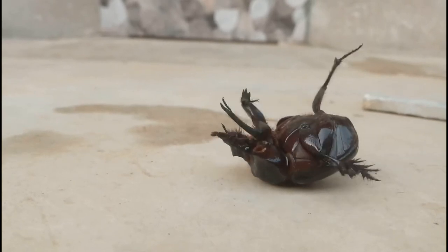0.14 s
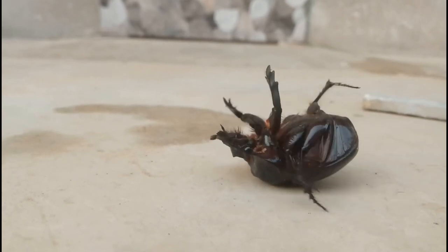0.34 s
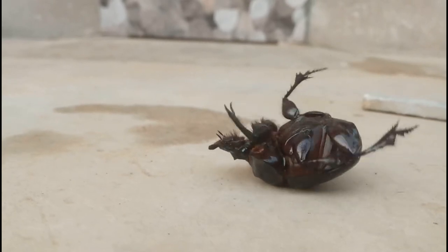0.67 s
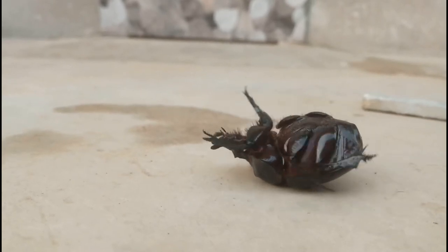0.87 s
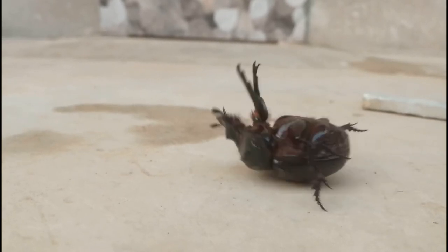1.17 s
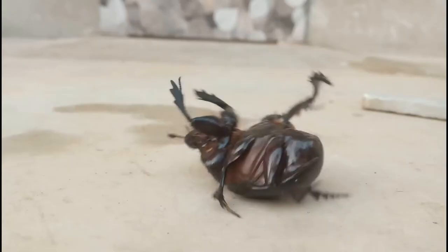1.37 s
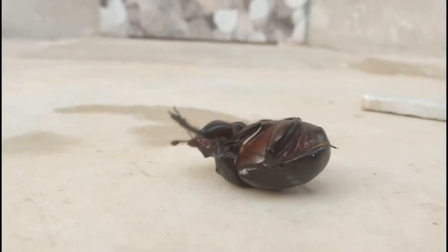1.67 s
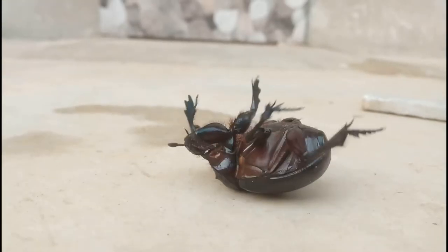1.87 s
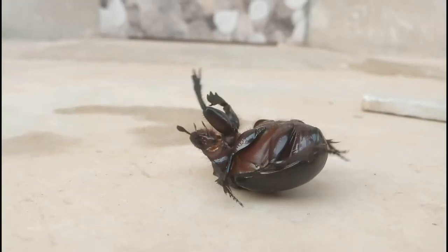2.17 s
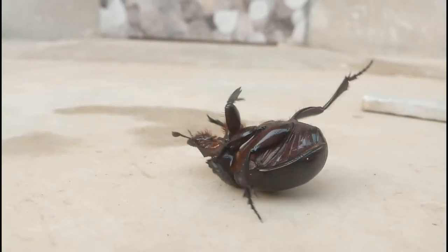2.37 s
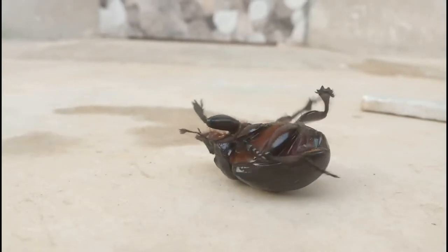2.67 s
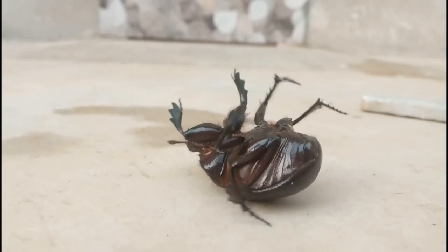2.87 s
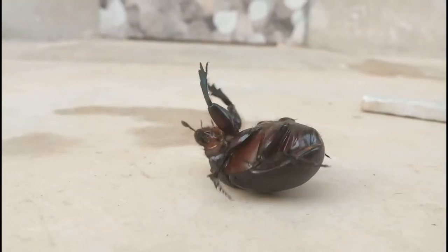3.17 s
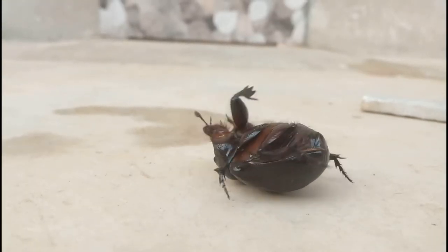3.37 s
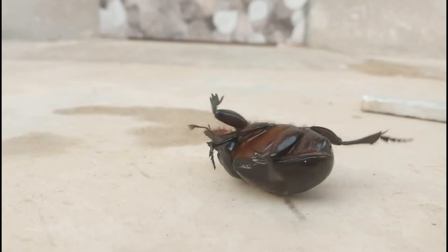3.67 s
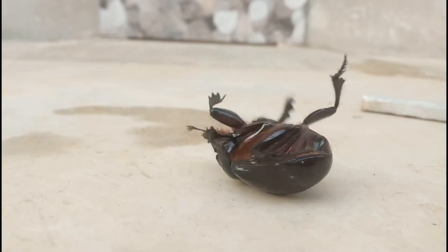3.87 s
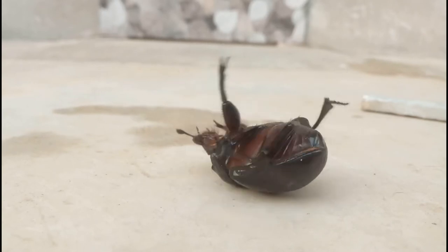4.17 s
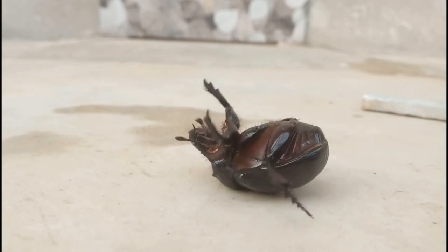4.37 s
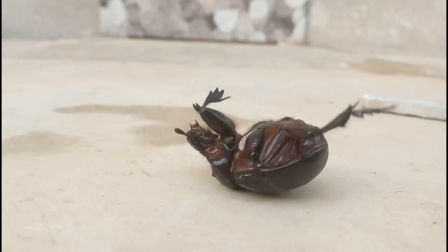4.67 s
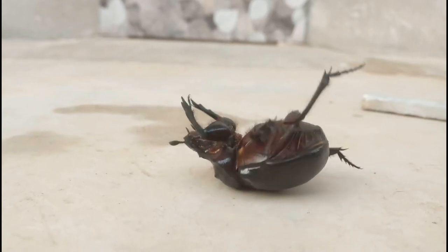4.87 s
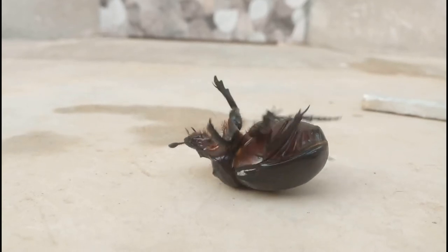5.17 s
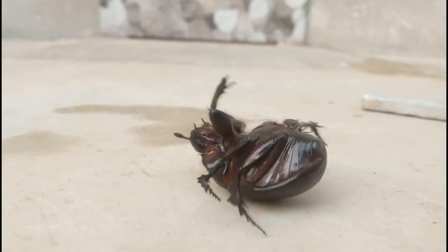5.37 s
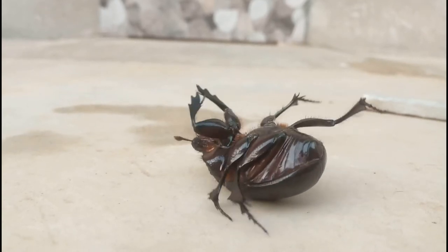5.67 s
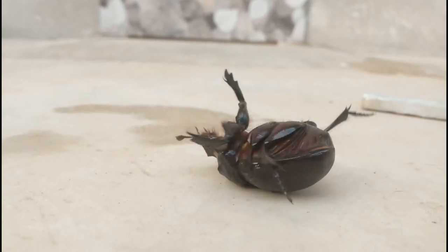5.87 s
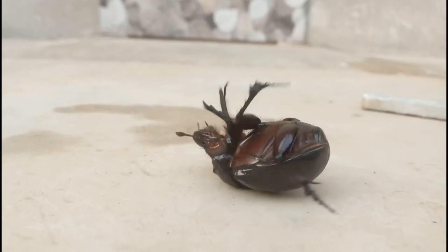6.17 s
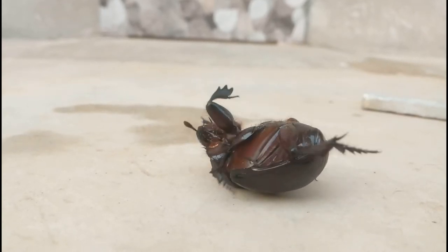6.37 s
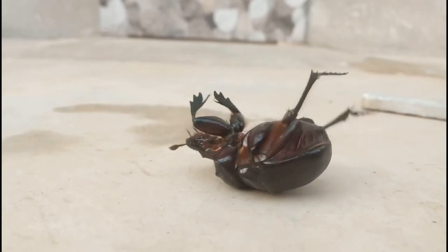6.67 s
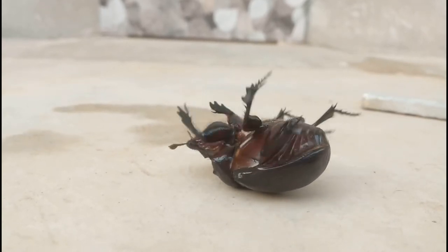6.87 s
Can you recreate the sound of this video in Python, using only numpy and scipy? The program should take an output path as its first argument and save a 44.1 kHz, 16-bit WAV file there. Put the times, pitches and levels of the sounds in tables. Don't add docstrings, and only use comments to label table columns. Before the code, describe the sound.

A large beetle stuck on its back rasps close by, scratchy zipping strokes swelling fast then slower, with tiny dry ticks between, over faint outdoor hiss.

```python
import sys
import numpy as np
from scipy import signal
from scipy.fft import rfft, irfft
from scipy.io import wavfile
from scipy.ndimage import uniform_filter1d, map_coordinates

SR = 44100
rng = np.random.default_rng(int(sys.argv[2]) if len(sys.argv) > 2 else 0)


def wav_record(signal):
    frames = np.transpose(np.atleast_2d(signal))
    bounded = np.clip(frames, -1, 1)
    quanta = np.round(bounded * 32767).astype(np.int16)
    wavfile.write(sys.argv[1], SR, quanta)


def linear_from_db(decibels):
    return 10 ** (np.asarray(decibels, float) / 20)


N = 310023
T = np.arange(N) / SR

# (start t/s, end t/s)
PUSH_SPANS = [(0, 0.39), (1.19, 1.52), (2.33, 2.86), (3.655, 4.38), (4.68, 5.22), (6.39, 6.78)]
# (start t/s, end t/s)
STALL_SPANS = [(.455, .528), (1.603, 1.633), (2.612, 2.6795), (2.921, 2.976), (4.039, 4.114),
               (4.289, 4.307), (4.984, 5.019), (5.24, 5.292), (6.905, 6.98)]
# (t/s, level/dB, ridge rate/Hz, treble/dB)
STROKE_TURNS = [(0.0, -30.5, 423, 6.5), (0.255, -40, 720, 4), (0.49, -35.5, 420, 4.5),
                (0.75, -32.5, 505, 4.5), (1.05, -36, 264, 4.5), (1.19, -36, 1290, -5),
                (1.405, -32, 1080, -6), (1.62, -30.5, 447, -2), (1.82, -33, 190, 0), (2.25, -30.5, 288, -5),
                (2.64, -31, 654, -7), (2.945, -30.5, 430, 1.5), (3.105, -29.5, 585, -1.5),
                (3.66, -37, 934, -7.5), (3.79, -23.5, 1650, -5), (4.08, -26, 420, -4),
                (4.296, -30, 420, -1), (4.65, -28, 1180, -10.5), (4.93, -24, 720, -2), (5.0, -40, 830, -6),
                (5.138, -33.5, 700, -4), (5.255, -28, 335, -3), (5.625, -29, 275, -2.5),
                (5.795, -27, 570, -3.5), (6.045, -33.5, 620, -6), (6.38, -41, 600, -13),
                (6.745, -30, 1190, -2.5), (6.935, -30, 400, -1), (7.03, -28.5, 260, -3)]
# (t/s, level/dB, ridge rate/Hz, treble/dB)
STROKE_HEIGHTS = [(0.13, -28.5, 1520, 2.5), (0.35, -25.5, 1590, 2), (0.675, -33.5, 710, 8.5),
                  (0.84, -34, 950, 5), (1.125, -33, 740, 3.5), (1.26, -26.5, 2000, -4),
                  (1.49, -21.5, 1640, -3.5), (1.77, -32, 485, -1.5), (1.915, -27.5, 660, -1.5),
                  (2.405, -25.5, 1500, -4.5), (2.76, -22.5, 1370, -4.5), (3.025, -27.5, 577, -2.5),
                  (3.25, -25.5, 750, -2.5), (3.715, -24.5, 2080, -8), (3.915, -20, 1340, -4.5),
                  (4.15, -23.5, 730, -3.5), (4.45, -27.5, 790, -5.5), (4.76, -22, 1400, -2),
                  (4.981, -23.5, 620, 0), (5.09, -30, 1310, -7), (5.19, -30.5, 427, -6),
                  (5.38, -26, 610, -2.5), (5.705, -25, 455, -3.5), (5.864, -26, 810, -1.5),
                  (6.23, -26, 1280, -8.5), (6.5, -20.5, 1300, -4), (6.84, -26.5, 380, -5),
                  (6.995, -28.5, 420, -2)]


def evened(x):
    return x / np.sqrt(np.mean(x ** 2) + 1e-20)


def drift(size):
    return evened(uniform_filter1d(uniform_filter1d(rng.standard_normal(N), size=size), size=size))


def within(spans):
    return sum((T >= start) & (T < end) for start, end in spans) > 0


def read(points, hz):
    f, value = np.transpose(points)
    return np.interp(np.log(hz + 1), np.log(f + 1), value, left=-70, right=-70)


def swell(at_turns, at_heights, quick_s, slow):
    clock = np.cumsum(~within(STALL_SPANS)) / SR
    turn, height = (clock[np.minimum(np.array(rows)[:, 0] * SR, N - 1).astype(int)]
                    for rows in (STROKE_TURNS, STROKE_HEIGHTS))
    stroke = np.clip(np.searchsorted(turn, clock) - 1, 0, len(height) - 1)
    nearest = stroke + (clock > height[stroke])
    away = abs(clock - turn[nearest])
    reach = abs(height[stroke] - turn[nearest]) + 1e-4
    left = np.clip(1 - away / reach, 0, 1) * (slow + (1 - slow) * np.exp(-away / quick_s))
    return at_heights[stroke] + left * (at_turns[nearest] - at_heights[stroke])


def judder():
    judder_hz, build_up_s, clean_s = 255, 0.14, 0.07
    stalls = np.r_[np.array(STALL_SPANS)[:, 0], 99]
    pushes = np.array(PUSH_SPANS)[:, 0]
    since_push = T - pushes[np.searchsorted(pushes, T, "right") - 1]
    to_stall = stalls[np.searchsorted(stalls, T)] - T
    settled = 1 - 0.85 * np.exp(-(since_push / clean_s) ** 2)
    depth = 0.15 + 1.7 * np.exp(-to_stall / build_up_s)
    beat = np.cos(2 * np.pi * np.cumsum(judder_hz * np.exp(0.2 * drift(200))) / SR)
    wander = np.where(within(PUSH_SPANS), 0.12, 0.22) * drift(220)
    jerk = np.exp(settled * (depth * beat + wander))
    return jerk / uniform_filter1d(jerk, size=2500)


def train(per_s, jerk, uneven, spread_db):
    draw = rng.standard_normal((30000, 2))
    ridge = np.arange(30000) + 0.5
    at = np.interp(ridge, np.cumsum(per_s * jerk) / SR, np.arange(N), right=N)
    crossed = at < N - 1
    at, draw = at[crossed].astype(int), draw[crossed]
    size = linear_from_db(spread_db[at] * draw[:, 0]) * np.sqrt(SR / per_s[at])
    at = np.clip(at + uneven[at] * draw[:, 1] * SR / per_s[at], 0, N - 1).astype(int)
    return np.bincount(at, size, N)


def ticks():
    # (t/s, peak level at the near microphone/dB)
    lone_ticks = [(0.4615, -16), (0.5167, -11), (0.5203, -14), (0.524, -10), (1.6046, -26), (2.6125, -11),
                  (2.6185, -14), (2.6268, -16), (2.6787, -25), (2.9222, -15), (2.9285, -11), (4.0407, -13),
                  (4.0436, -12), (4.0496, -7), (4.1017, -9), (4.1117, -11), (6.9516, -25), (5.1494, -10.5),
                  (5.1485, -10.5), (5.2415, -10), (5.2543, -10.5), (5.2857, -9), (5.1597, -10),
                  (5.1948, -7), (6.9158, -10), (6.9256, -11.5), (6.9347, -14), (6.9478, -12)]
    # (start t/s, end t/s, first gap/ms, last gap/ms, peak level/dB)
    creeping_runs = [(.477, 0.51, 4.0, 4.3, -20), (1.6094, 1.63, 4.4, 3.8, -16),
                     (2.9368, 2.974, 6.3, 3.5, -14.5), (4.0534, 4.096, 3.1, 8.5, -16.5),
                     (6.957, 6.972, 5.2, 6.2, -10), (4.9849, 5.013, 6.3, 4.04, -9.5),
                     (4.986, 5.014, 6.4, 6.1, -15), (5.266, 5.281, 4, 2.95, -14.5)]
    rows = list(lone_ticks)
    for start, end, first_ms, last_ms, db in creeping_runs:
        s = start
        for late, loud in rng.standard_normal((30, 2)):
            if s < end:
                rows.append((s + 0.00029 * late, db + 0.76 * loud))
            progress = min((s - start) / (end - start), 1)
            s += (first_ms + (last_ms - first_ms) * progress) / 1000
    return np.transpose(rows)


def ridges():
    _, turn_db, turn_per_s, turn_treble = np.transpose(STROKE_TURNS)
    _, top_db, top_per_s, top_treble = np.transpose(STROKE_HEIGHTS)
    push, stall = within(PUSH_SPANS), within(STALL_SPANS)

    level_db = swell(turn_db, top_db, quick_s=0.046, slow=0.24)
    per_s = np.exp(swell(np.log(turn_per_s), np.log(top_per_s), quick_s=0.04, slow=0.5))
    treble_db = swell(turn_treble, top_treble, quick_s=1, slow=0.7)
    low_db = -0.07 - 0.4347 * (level_db + 29.5) + 1.41 * np.log2(per_s / 700)
    treble_db = np.where(stall, -0.5, treble_db)
    low_db = np.where(stall, -2.5, low_db)
    level_db = level_db + 0.85 * drift(900) * np.where(push, 0.4, 1)

    jerk = judder()
    main = train(per_s, jerk, np.where(push, 0.06, 0.12), np.where(push, 1.1, 1.6))
    second = train(1.3 * per_s, jerk, np.where(push, 0.3, 0.5), np.where(push, 2.5, 3.5))
    spikes = (main + linear_from_db(np.where(push, -15., -8.)) * second) * linear_from_db(level_db) * ~stall
    tick_s, tick_db = ticks()
    spikes[(tick_s * SR).astype(int)] = linear_from_db(tick_db + 5.0)
    spikes *= np.where(push, 1, -1)

    low = signal.oaconvolve(spikes, signal.firwin(63, 4200, fs=SR), "same")
    high = spikes - signal.oaconvolve(spikes, signal.firwin(63, 9000, fs=SR), "same")
    return spikes + (linear_from_db(low_db) - 1) * low + (linear_from_db(treble_db) - 1) * high


def ring(spikes, colour, causal=0.75):
    level_db = uniform_filter1d(read(colour, np.fft.rfftfreq(512, 1 / SR)), size=3)
    log_gain = np.log(linear_from_db(level_db))
    phase = -signal.hilbert(np.r_[log_gain, log_gain[-2:0:-1]]).imag[:257]
    pulse = np.roll(irfft(np.exp(log_gain + 1j * causal * phase)), 64)
    return signal.oaconvolve(spikes, pulse / np.linalg.norm(pulse))[64:N + 64]


def tail(start_ms, t60, size):
    t = np.arange(size) / SR - start_ms / 1000
    x = rng.standard_normal(size) * linear_from_db(-60 * t / t60) * (t > 0)
    return x / np.linalg.norm(x)


def scattered(spikes, leg, start_ms, t60, size):
    return sum(signal.oaconvolve(spikes * (leg == k), tail(start_ms, t60, size))[:N] for k in range(10))


def echoes(x, late):
    # (delay/ms, gain)
    path_early = [(0.023, 0.51), (0.296, 1), (0.409, 0.96), (0.476, 0.44), (0.499, -0.24), (0.59, 0.32),
                  (0.952, -0.091), (1.338, 0.21)]
    path_late = [(0.092, 0.35), (0.338, 0.68), (0.41, 0.56), (0.495, 0.63), (0.635, 0.2), (0.726, -0.16),
                 (1, -0.0058), (1.382, 0.013)]
    out = np.zeros(N)
    for (ms0, gain0), (ms1, gain1) in zip(path_early, path_late):
        at = np.arange(N) - (ms0 + late * (ms1 - ms0)) * SR / 1000
        out += (gain0 + late * (gain1 - gain0)) * map_coordinates(x, [at], order=3)
    return out


def beetle():
    # (f/Hz, level/dB)
    shell_early = [(700, -61), (1300, -23), (1800, -12.5), (2700, -6.5), (3800, -3), (5000, 1), (6000, 1),
                   (7600, 1.5), (8600, -8), (10300, -9.5), (11800, -19), (13500, -18.5), (15000, -22)]
    shell_late = [(700, -40), (1300, -22), (1800, -21.5), (2700, -11.5), (3800, -7.5), (5000, -5),
                  (6000, -2), (7600, -4), (8600, -10), (10300, -11), (11800, -26), (13500, -21.5),
                  (15000, -31.5)]
    # (f/Hz, level/dB)
    far_early = [(700, -32.5), (1300, -17), (1800, -5), (3000, -17), (4300, -0.5), (5000, -10), (5800, -4),
                 (7700, 2), (8600, -2), (9600, -17), (10600, -0.5), (12200, -35), (14000, -18),
                 (15200, -27)]
    far_late = [(700, -29), (1300, -18), (1800, -8.5), (3000, -9.5), (4300, -2.5), (5000, -19), (5800, -7),
                (7700, -2.5), (8600, -0.5), (9600, -5.5), (10600, 2), (12200, -20.5), (14000, -18),
                (15200, -21)]
    # (t/s, left over right/dB)
    facing = [(0.0, -2.5), (0.35, -2), (0.94, -6.5), (1.23, -2.5), (1.39, -8), (1.45, -2), (2.0, -4),
              (2.25, -0.5), (2.66, 2.5), (2.7, 4.5), (3.29, 3), (3.54, 7), (3.66, 6), (7.03, 2.0)]
    roll_s, gap_hz, gap_width_hz = 1.196, 7850, 390

    spikes = ridges()
    late = np.clip((T - roll_s) / 0.29 + 0.2, 0, 1)
    leg = np.repeat(rng.integers(0, 10, N // 40 + 1), 40)[:N]
    scatter = scattered(spikes, leg, start_ms=0.1, t60=0.014, size=400)
    smear = scattered(spikes, leg, start_ms=0.3, t60=0.015, size=600)
    near, floor, far = np.zeros((3, N))
    before = (1 - late, shell_early, far_early, 0.1)
    after = (late, shell_late, far_late, -3.0)
    for share, shell, shade, far_db in (before, after):
        near += ring(share * spikes, shell, causal=0.55)
        floor += ring(share * smear, shell)
        far += linear_from_db(far_db) * ring(share * scatter, shade)

    left = near + linear_from_db(-10) * floor
    right = linear_from_db(-2.0 + 1.43 * late) * echoes(near, late) + far
    gap = signal.lfilter(*signal.iirpeak(gap_hz, gap_hz / gap_width_hz, SR), right)
    right = linear_from_db(-0.98) * (right + 0.74 * late * gap)
    pan_db = np.interp(T, *np.transpose(facing))
    turn_db = (pan_db - uniform_filter1d(pan_db, size=40000)) / 2
    return linear_from_db(-0.73) * np.array([left * linear_from_db(turn_db), right * linear_from_db(-turn_db)])


def walls(x):
    return np.array([signal.oaconvolve(c, tail(4.0, 0.02, size=6000))[:N] for c in x])


def noise(colour, same, patchy_db):
    a, b, c, d, patches = rng.standard_normal((N // 256 + 5, 513, 5)).T
    patches = evened(uniform_filter1d(uniform_filter1d(patches, size=5, axis=0), size=14, axis=1))
    left = a + 1j * b
    right = same * left + np.sqrt(1 - same ** 2) * (c + 1j * d)
    z = np.array([left, right]) * linear_from_db(patchy_db * patches)
    white = signal.istft(z, nperseg=1024, noverlap=768)[1][:, :N]
    gain = linear_from_db(read(colour, np.fft.rfftfreq(N, 1 / SR)))
    return evened(irfft(rfft(white) * gain, N))


def yard():
    # (f/Hz, level/dB)
    yard_colour = [(590, -64), (1000, -49), (1730, -5), (4650, -12), (5400, 6), (6120, -9), (7790, -7),
                   (11200, -19), (12200, -18), (15500, -19)]
    return linear_from_db(-49.5) * noise(yard_colour, same=0.06, patchy_db=5.0)


def rumble():
    # (f/Hz, level/dB)
    rumble_colour = [(18, -1), (35, -4.5), (76, -0.5), (164, -8), (258, -19), (333, -9), (574, -11.5),
                     (689, -7.5), (932, -16.5), (1080, -4.5), (1300, -10), (1690, -59), (2860, -120)]
    return linear_from_db(-62.5) * noise(rumble_colour, same=-0.44, patchy_db=2.6)


def whine():
    # (t/s, f/Hz, level/dB)
    whine_course = [(3.1, 1082, -68), (3.18, 1074, -59), (3.3, 1078, -66), (3.42, 1084, -55.5),
                    (3.55, 1077, -66), (3.68, 1098, -78)]
    s, hz, level_db = np.transpose(whine_course)
    waver_hz, flutter_db = 21 * drift(600), 3.8 * drift(600)
    tone = np.sin(2 * np.pi * np.cumsum(np.interp(T, s, hz) + waver_hz) / SR)
    level = linear_from_db(np.interp(T, s, level_db, left=-120, right=-120) + flutter_db)
    return np.sqrt(2) * tone * level * linear_from_db(np.array([[-6.], [3.]]))


def scene():
    rasp = beetle()
    return rasp + linear_from_db(-11.5) * walls(rasp) + yard() + rumble() + whine()


def top_cut(x):
    return signal.sosfilt(signal.butter(12, 16320, fs=SR, output="sos"), x)


def record(dry):
    # (f/Hz, width/Hz, depth 0-1)
    port_dips = [(1362, 160, 0.82), (5020, 190, 1), (8400, 280, 0.32), (9640, 380, 0.33),
                 (10260, 870, 0.04), (12660, 1400, 0.63)]
    dropout_s, half_s = 4.298, 0.034
    near, far = dry * np.clip(abs(T - dropout_s) / half_s, 0.2, 1) ** 1.4
    for hz, width, depth in port_dips:
        far = far - depth * signal.lfilter(*signal.iirpeak(hz, hz / width, SR), far)
    return top_cut(np.array([near, far]))


dry = scene()
out = record(dry)
wav_record(out)
```